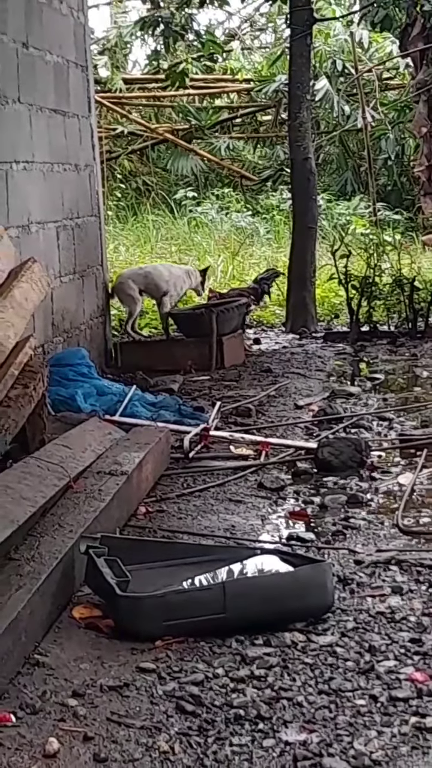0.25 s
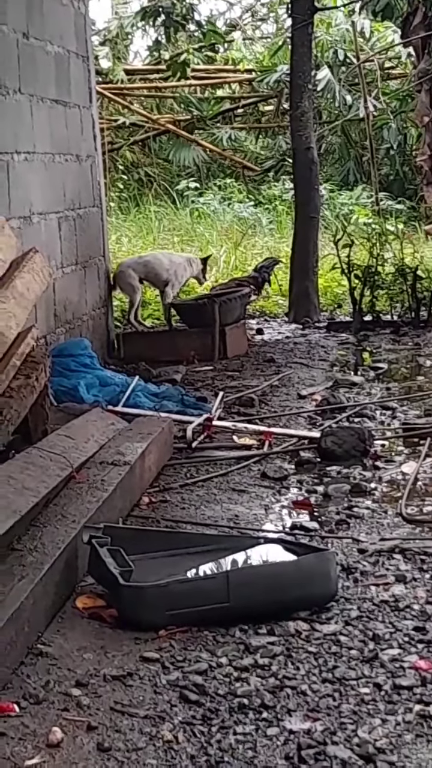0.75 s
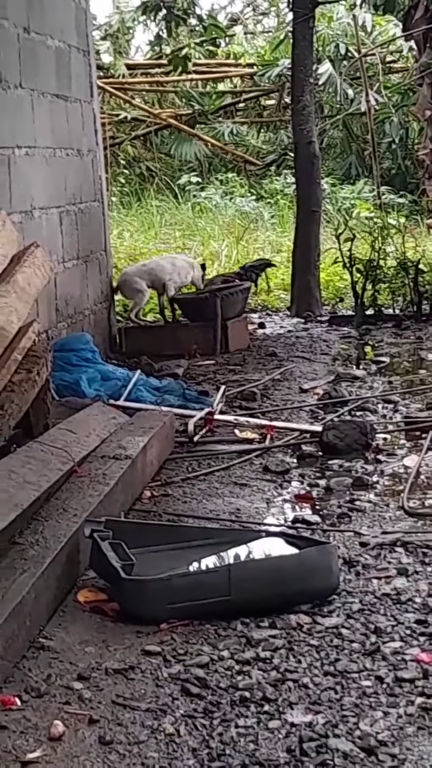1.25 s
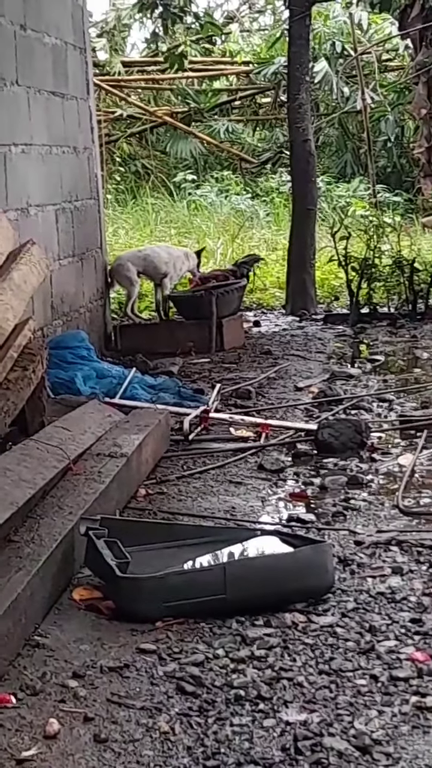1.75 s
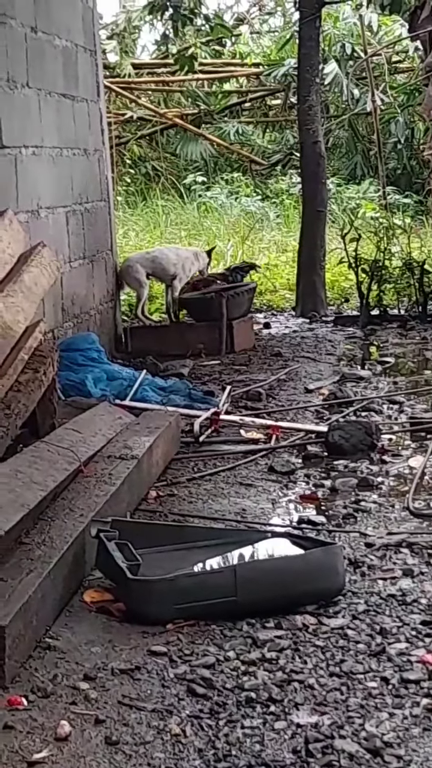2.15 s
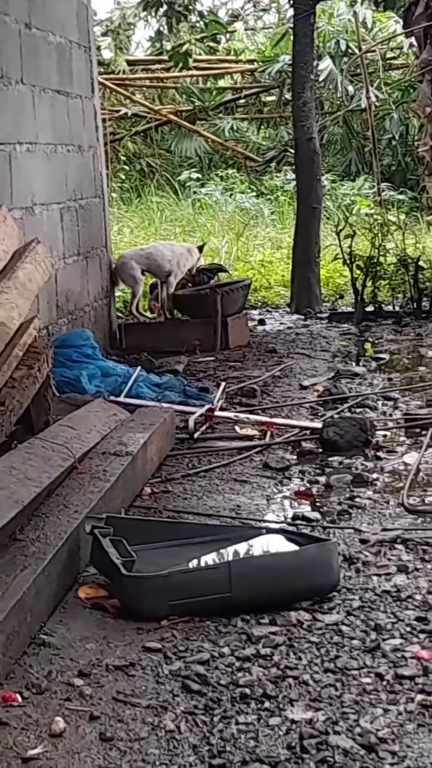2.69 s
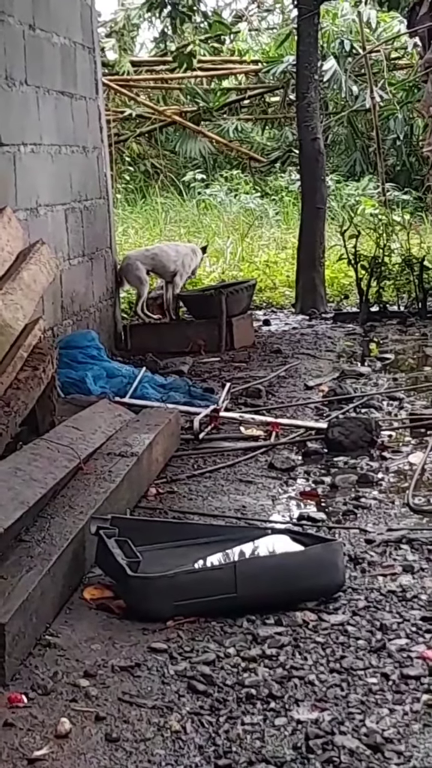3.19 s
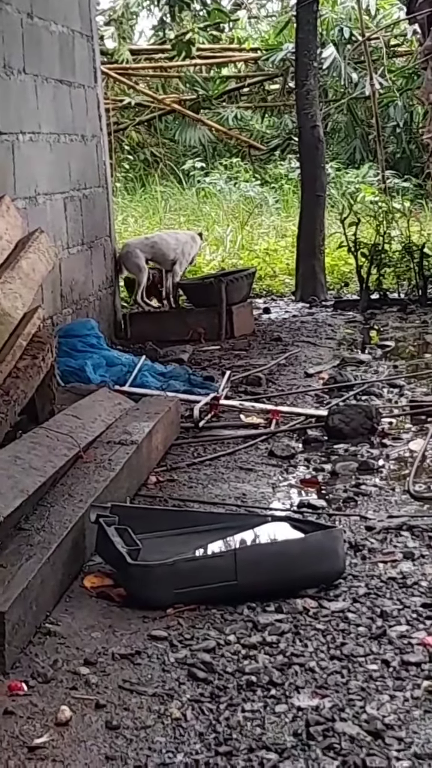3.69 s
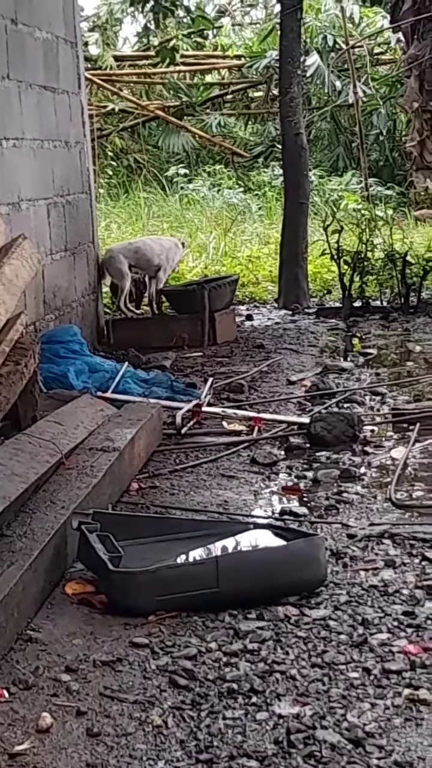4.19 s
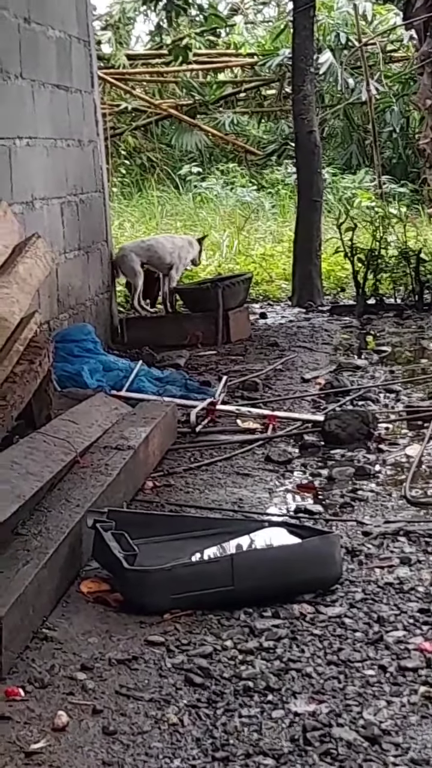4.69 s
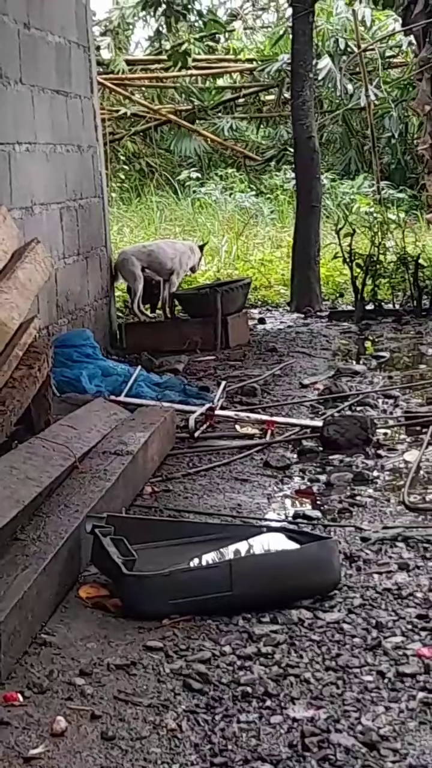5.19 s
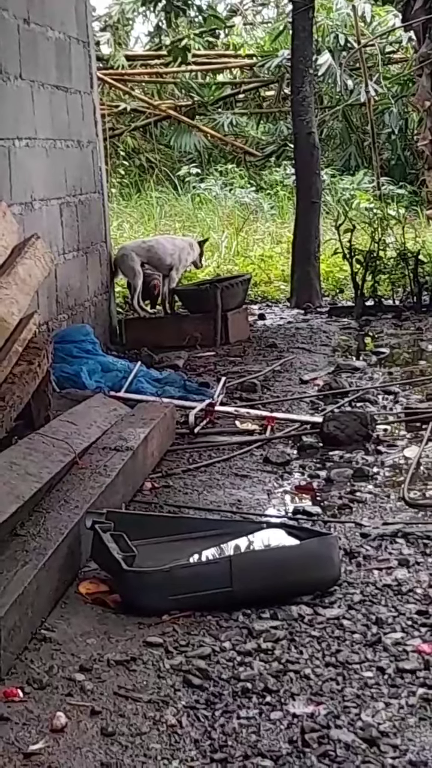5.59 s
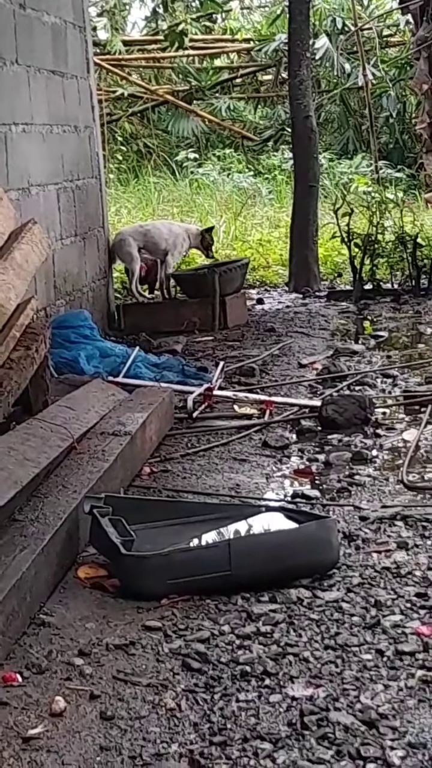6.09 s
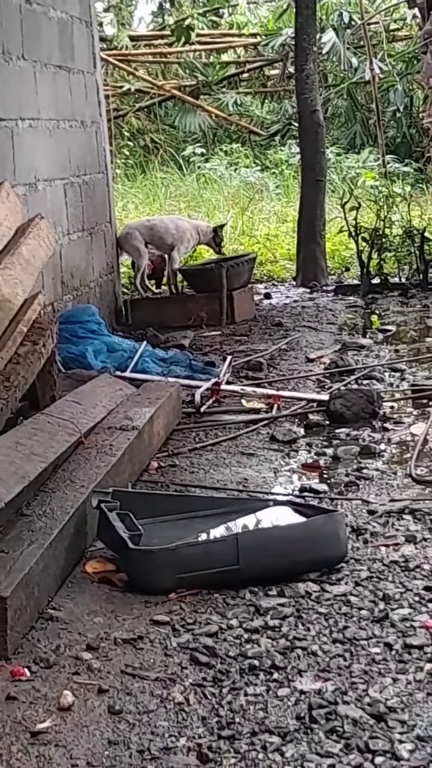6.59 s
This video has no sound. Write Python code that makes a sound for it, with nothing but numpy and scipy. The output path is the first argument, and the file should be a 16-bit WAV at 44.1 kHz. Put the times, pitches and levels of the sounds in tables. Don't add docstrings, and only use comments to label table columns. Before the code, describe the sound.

Two sharp barks, drawn-out throaty growls and a muffled woof ring off a wall while small birds chirp, a dove coos and an engine rumbles far away.

```python
import sys
import numpy as np
from scipy import signal
from scipy.fft import rfft, irfft
from scipy.io import wavfile
from scipy.ndimage import uniform_filter1d

SR = 44100
rng = np.random.default_rng(int(sys.argv[2]) if len(sys.argv) > 2 else 0)


def master_out(mix):
    frames = np.transpose(np.atleast_2d(mix))
    ceiling = np.clip(frames, -1, 1)
    pcm = np.round(ceiling * 32767).astype(np.int16)
    wavfile.write(sys.argv[1], SR, pcm)


def invert_db(x):
    u = np.asarray(x, float) / 20
    return 10 ** u


N = 302073

# centre_hz, width_hz, level_db
BARK_THROAT = [(310, 220, -23), (876, 340, -2.5), (1690, 790, -9.5), (2440, 130, -20.5), (2950, 623, -8.5),
               (4120, 1400, -20), (6000, 2800, -31), (11370, 1700, -28.5), (13800, 3100, -40.5)]


def evened(x):
    return x / np.sqrt(np.mean(x ** 2) + 1e-20)


def read(points, hz):
    f, value = np.transpose(points)
    return np.interp(np.log(hz + 1), np.log(f + 1), value)


def add(mix, s, sound):
    part = mix[..., round(s * SR):][..., :sound.shape[-1]]
    part += sound[..., :part.shape[-1]]


def sides(left_db, right_db):
    return invert_db([[left_db], [right_db]])


def unroll(rows):
    s, *columns = np.transpose(rows)
    t = np.arange(s[0], s[-1], 1 / SR)
    return s[0], [np.interp(t, s, c) for c in columns]


def wander(count, size):
    return evened(uniform_filter1d(uniform_filter1d(rng.standard_normal(count), size), size))


def throat(x, modes):
    out = np.zeros(len(x))
    for k, (hz, width, db) in enumerate(modes):
        b, a = signal.iirpeak(hz, hz / width, SR)
        ringing = signal.lfilter(b, a, signal.lfilter(b, a, x))
        out += (-1) ** k * invert_db(db) * ringing
    return out


def whistle(hz, db, fade):
    turns = np.cumsum(hz * (1 + .006 * wander(len(hz), size=80))) / SR
    return np.sqrt(2) * invert_db(db) * np.sin(2 * np.pi * turns) * signal.windows.tukey(len(hz), fade)


def hiss(points, size, patchy_db):
    # frequency_hz, likeness 0-1
    likeness = [(60, 0.89), (180, 0.92), (550, 0.6), (1650, 0.34), (4970, 0.047), (15000, 0.048)]
    # frequency_hz, left_minus_right_db
    tilt = [(60, 1), (240, -5), (950, -1), (3770, -4), (15000, -0.5)]
    hz = np.fft.rfftfreq(size, 1 / SR)
    a, b, c, d, patches = rng.standard_normal((4 * N // size + 5, len(hz), 5)).T
    patches = uniform_filter1d(patches, size=10, axis=0)
    patches = evened(uniform_filter1d(patches, size=12, axis=1))
    same = np.clip(read(likeness, hz), 0, 1)[:, None]
    left = a + 1j * b
    right = same * left + np.sqrt(1 - same ** 2) * (c + 1j * d)
    z = np.array([left, right])
    inside = (hz >= points[0][0]) & (hz <= points[-1][0])
    lean = invert_db(np.outer([.5, -.5], read(tilt, hz)))[:, :, None]
    z *= lean * invert_db(read(points, hz)[:, None] + patchy_db * patches) * inside[:, None]
    return evened(signal.istft(z, nperseg=size, noverlap=3 * size // 4)[1][:, :N])


def engine():
    # frequency_hz, density_db
    rumble = [(15, -75.5), (32, -32), (52, -9), (76, -4), (113, -6.5), (166, -17), (260, -26.5),
              (400, -66.5)]
    # time_s, level_db
    throb = [
        (0, -56),
        (1.3, -59),
        (2.099, -59),
        (3.301, -59.5),
        (4.3, -62.5),
        (5.698, -55.5),
        (6.85, -65.5),
    ]
    # centre_s, level_db
    boom_swells = [(.03, -52), (.3, -56), (0.548, -61), (.79, -54.5), (1.0, -56), (1.498, -51), (1.68, -54),
                   (1.851, -62), (2.099, -58), (2.51, -52), (2.77, -53.5), (3.08, -55), (3.32, -57.5),
                   (3.9, -58), (4.12, -67.5), (4.6, -70.5), (5.05, -63), (5.45, -59.5), (5.7, -51)]
    boom_hz, boom_s = 92.3, 0.14
    s, db = np.transpose(throb)
    t = np.arange(N) / SR
    swells = sum(invert_db(boom_db) * np.exp(-((t - at) / (.5 * boom_s)) ** 2) for at, boom_db in boom_swells)
    turns = np.cumsum(boom_hz * (1 + 0.02 * wander(N, size=3000))) / SR
    booms = swells * np.sqrt(2) * np.sin(2 * np.pi * turns)
    return invert_db(np.interp(t, s, db)) * hiss(rumble, size=4096, patchy_db=4.5) + booms * sides(-.6, .4)


def air():
    # frequency_hz, density_db
    air_spectrum = [(150, -5.5), (220, -26.5), (300, -6.5), (480, -22.5), (1200, -24), (2000, -23.5),
                    (2900, -16), (4400, -14), (8500, -11.5)]
    return invert_db(-61) * hiss(air_spectrum, size=512, patchy_db=2.5)


def insects():
    # frequency_hz, density_db
    insect_spectrum = [(8500, -13.5), (9550, -11.5), (10500, -2), (11400, -13), (12100, -29.5),
                       (13000, -21.5), (13600, -23.5), (15000, -22)]
    return invert_db(-59) * hiss(insect_spectrum, size=512, patchy_db=1.1)


def bark(rows, modes, second_hz, rough, fade):
    s, (effort_db, hz, second_db, mouth_db) = unroll(rows)
    count, mouth = len(hz), invert_db(mouth_db)
    sag = np.sqrt(np.minimum(hz / hz.mean(), 1))
    other_hz = second_hz * sag * (1 + .03 * wander(count, size=300))
    jitter = 1 + .016 * wander(count, size=50)
    turns = np.cumsum(np.array([hz, other_hz]) * jitter, axis=1) / SR
    voices = []
    for u in turns:
        overtones = sum(np.cos(2 * np.pi * k * u) for k in range(2, 9))
        fundamental = np.sqrt(2) * np.cos(2 * np.pi * u)
        voices.append(fundamental + 0.59 * mouth * throat(overtones, modes))
    first, second = voices
    breath = (0.69 + np.exp(-(turns[0] % 1) / 0.21)) * rng.standard_normal(count)
    breath = rough * mouth * (1 + invert_db(second_db)) * evened(throat(breath, modes))
    voice = first + invert_db(second_db) * second + breath
    return s, invert_db(effort_db) * voice * signal.windows.tukey(count, fade)


def barks():
    # time_s, effort_db, pitch_hz, second_voice_db, mouth_opening_db (on the overtones)
    bark_curves = [
        [(0, -23.5, 777, -4, 13.5), (.022, -26, 750.4, -0.5, 3), (.031, -22, 735, -2.5, 1),
         (.037, -40.5, 700, -11.5, 2), (.06, -34, 600, -7, 0), (.085, -57.5, 480, -16, 3.5)],
        [(1.245, -51.5, 669.5, -14, -11.5), (1.272, -43.5, 860, -9, 10.5), (1.282, -22, 907, -2, -15),
         (1.298, -30, 880.6, 9, 6), (1.318, -23, 884.3, -0.5, 3.5), (1.345, -18.5, 806.3, 0.5, -1),
         (1.368, -19.5, 800, -10, -1.5), (1.39, -28.5, 682, -9, 0.5), (1.435, -52.5, 490, 5.5, 1)],
    ]
    out = np.zeros(N)
    for rows, second_hz, rough in zip(bark_curves, (884, 1075), (.2, .3)):
        add(out, *bark(rows, BARK_THROAT, second_hz, rough, fade=0.014))
    return out


def linger():
    # pitch_hz, level_db, t60_s
    hanging = [(750, -43.5, 0.49), (880, -36, 0.22), (1540, -31, .55), (1850, -42.5, 0.45),
               (2945, -36.5, .5), (3065, -32.5, 0.45)]
    haze_db, haze_t60_s = -35, 0.76
    t = np.arange(SR // 2) / SR
    lines = np.zeros((2, len(t)))
    for ear in lines:
        for hz, db, t60 in hanging:
            decay_db = db - 60 * t / t60 + 5 * wander(len(t), size=500)
            ear += invert_db(decay_db) * whistle(hz + 0 * t, 0, fade=0)
    haze = np.array([evened(throat(rng.standard_normal(len(t)), BARK_THROAT)) for _ in range(2)])
    return lines + invert_db(haze_db - 60 * t / haze_t60_s) * haze


def birds():
    # start_s, start_hz, length_s, level_db
    peeps = [(0.294, 5050, 0.071, -54.5), (0.748, 5010, 0.1, -54), (3.425, 5086, 0.1, -55),
             (3.757, 4930, 0.04, -51.5), (4.155, 4775, 0.057, -54), (4.934, 5120, 0.066, -69),
             (5.206, 5190, .07, -59), (6.302, 5660, 0.055, -63.5), (5.6, 5100, 0.11, -61),
             (5.828, 5010, 0.044, -62), (6.079, 5140, 0.085, -62.5), (6.48, 4670, 0.1, -67)]
    chucks = [(1.903, 3400, .11, -69), (2.497, 3350, .065, -66), (3.131, 3500, .08, -70),
              (2.575, 2350, .06, -71), (4.53, 4500, .1, -66), (3.573, 3610, .04, -67),
              (5.49, 3400, .05, -69), (5.833, 4050, .07, -69), (6.068, 3440, .04, -67),
              (6.329, 3580, .045, -66), (6.535, 3240, .04, -68), (6.73, 3730, .067, -67)]
    swoops = [(3.96, 4950, .14, -65), (4.63, 5350, .2, -62.5), (4.925, 5500, .135, -65),
              (5.08, 4550, .22, -63), (5.335, 5000, .24, -66), (6.6, 5300, .23, -70)]
    lifts = [(1.575, 5010, 0.06, -64.5), (3.691, 5320, 0.062, -61), (4.094, 5860, 0.08, -66.5),
             (4.455, 5460, 0.098, -60), (6.438, 6000, 0.093, -63), (6.791, 5610, .06, -69.5)]
    pips = [(1.692, 2200, .04, -66), (1.64, 6000, .06, -67), (2.915, 5720, .075, -61),
            (5.2, 3950, .08, -66), (2.065, 4800, .15, -62.5), (2.09, 4250, .08, -69),
            (1.83, 4650, .12, -68), (5.44, 2550, .04, -68), (5.04, 3500, .12, -70), (5.27, 2800, .05, -67),
            (5.26, 5700, .05, -68), (5.845, 3620, .07, -64), (2.28, 2450, .05, -68), (2.53, 2550, .06, -67),
            (6.09, 2600, .07, -66), (6.35, 2620, .06, -64), (6.56, 2560, .06, -66), (6.79, 2560, .04, -63),
            (6.55, 4080, .22, -65), (.72, 6250, .08, -64), (.5, 4650, .14, -68), (.96, 4600, .07, -67),
            (1.17, 4600, .08, -67), (1.12, 2750, .12, -69), (4.55, 2700, .08, -68), (5.23, 4450, .12, -64),
            (3.43, 5000, .17, -64), (4.3, 4000, .1, -69)]
    dives = [(2.239, 3770, .067, -68), (4.33, 3700, .04, -66), (4.508, 4000, .04, -57)]
    # end_over_start_pitch, glide_bend, warble 0-1, left_minus_right_db, swell_db
    peep_shape = (.8, .8, .05, -3, 0)
    chuck_shape = (.68, .55, .02, 0, 3)
    swoop_shape = (.5, 2.8, .006, 0, 8)
    lift_shape = (1.16, .67, .025, -6, 0)
    pip_shape = (.99, 1, .025, -3, 0)
    dive_shape = (.58, .5, .003, 0, 4)
    # start_s, length_s, top_hz, bottom_hz, level_db
    trills = [
        (2.429, 0.11, 5650, 4350, -55),
        (2.646, 0.14, 5560, 4250, -54),
        (2.903, 0.153, 5600, 4180, -51.5),
        (3.145, 0.15, 5580, 4370, -54.5),
    ]
    trill_hz = 25.12
    kinds = [(peeps, peep_shape), (chucks, chuck_shape), (swoops, swoop_shape),
             (lifts, lift_shape), (pips, pip_shape), (dives, dive_shape)]
    out = np.zeros((2, N))
    for notes, (end, bend, warble, pan_db, swell_db) in kinds:
        for s, start_hz, length, db in notes:
            u = np.linspace(0, 1, round(length * SR))
            hz = start_hz * (1 + (end - 1) * u ** bend) * (1 + warble * wander(len(u), size=110))
            note = whistle(hz, db + swell_db * (u - .7), fade=.5)
            add(out, s, sides(.5 * pan_db, -.5 * pan_db) * note)
    for s, length, top_hz, bottom_hz, db in trills:
        u = np.arange(round(length * SR)) * trill_hz / SR % 1
        hz = (top_hz + (bottom_hz - top_hz) * u) * (1 + 0.032 * wander(len(u), size=100))
        add(out, s, whistle(hz, db, fade=0.56) * np.sin(np.pi * u) * sides(-1.5, 1.5))
    return out


def flock():
    count, busy_from_s, quietest_db = 40, 4.6, -81
    low_hz, high_hz = 3600, 5800
    out = np.zeros((2, N))
    for k, (when, pitch, fall, span, size, side) in enumerate(rng.random((count, 6))):
        first = busy_from_s if k % 3 else 0
        u = np.linspace(0, 1, round((.04 + .12 * span) * SR))
        glide = 1 - (.1 + .35 * fall) * u ** (.6 + 2.5 * span)
        hz = (low_hz + (high_hz - low_hz) * pitch) * glide
        pan_db = 4 * (side - .5)
        chirp = whistle(hz, quietest_db + 7 * size, fade=.6)
        add(out, first + when * (N / SR - first), sides(pan_db, -pan_db) * chirp)
    return out


def growl(rows):
    # frequency_hz, level_db
    muzzle = [(170, 2.5), (220, -3.5), (340, -0.5), (400, -0.5), (530, 2.5), (640, -12), (780, -35),
              (1050, -39.5)]
    # centre_hz, width_hz, level_db
    rasp = [(300, 160, -4.5), (550, 550, -10.5), (786, 420, -13.5)]
    # centre_hz, width_hz, level_db
    gape = [(860, 170, 2), (1282, 90.2, -12.5)]
    flutter_hz, flutter_depth, flutter_pitch, breath_share = 28, .42, .045, .5
    s, (hz, effort_db) = unroll(rows)
    count = len(hz)
    flap = np.sin(2 * np.pi * np.cumsum(flutter_hz * (1 + 0.15 * wander(count, size=2500))) / SR)
    turns = np.cumsum(hz * (1 + flutter_pitch * flap + .013 * wander(count, size=90))) / SR
    tone = np.zeros(count)
    for k in range(1, 6):
        partial = np.cos(2 * np.pi * k * turns + 1.72 * k)
        tone += np.sqrt(2) * invert_db(read(muzzle, k * hz) + 1.1 * wander(count, size=250)) * partial
    pulses = np.exp(-(turns % 1) / 1.6)
    breath = evened(throat(pulses * rng.standard_normal(count), rasp))
    closing = np.exp(-np.arange(count) / (.3 * SR))
    breath += 1.44 * closing * evened(throat(rng.standard_normal(count), gape))
    flap_amount = np.clip(0.57 + .25 * wander(count, size=2500), 0, 2)
    voice = invert_db(effort_db) * (tone + breath_share * breath) * (1 + flutter_depth * flap * flap_amount)
    return s, voice * signal.windows.tukey(count, 3000 / count)


def growls():
    # time_s, pitch_hz, effort_db
    growl_curves = [
        [(.37, 195, -45), (.41, 199.7, -54.5), (.6, 203.2, -54.5), (.85, 203.9, -52.5), (1.05, 202.2, -54.5),
         (1.19, 200.8, -54), (1.24, 264.4, -55.5), (1.3, 300, -41)],
        [(1.76, 196.7, -52.5), (1.96, 230, -50.5), (2.08, 202.1, -53), (2.25, 189.1, -60), (2.5, 174.4, -61.5),
         (2.7, 183.9, -59.5), (2.98, 212.7, -52), (3.54, 207.8, -53.5), (3.66, 161.2, -78)],
        [(4.58, 219.8, -46.5), (4.68, 174.4, -63), (4.85, 165.8, -63), (5.25, 187, -55), (5.5, 179.5, -59),
         (5.7, 189.2, -55), (5.98, 156.2, -63.5), (6.08, 162.5, -67), (6.16, 173.5, -81.5)],
    ]
    out = np.zeros(N)
    for rows in growl_curves:
        add(out, *growl(rows))
    return out


def dove():
    # offset_s, length_s, top_hz, level_db
    coo_notes = [
        (0, 0.044, 961, -53.5),
        (0.022, .152, 1149, -44.5),
        (0.177, 0.042, 1056, -52.5),
        (0.237, 0.0293, 1064, -47),
        (0.296, 0.034, 960, -52.5),
        (.392, 0.0395, 1005, -50),
        (0.493, 0.12, 1075, -51),
    ]
    # start_s, level_db, time_stretch, tiredness
    phrases = [
        (1.32, -5, 1.0, 1),
        (3.27, 0, 1.0, 1),
        (5.54, .5, 1.02, 2.6),
    ]
    scoop_depth, scoop_s, drop_depth, drop_s = 0.18, .012, 0.11, 0.018
    sag_hz_per_s, edge_db = 405, 6.5
    tire_db_per_s = 37.5
    out = np.zeros(N)
    for start, phrase_db, stretch, tired in phrases:
        for s, length, top_hz, db in coo_notes:
            t = np.arange(0, length, 1 / SR)
            scoop = np.clip(1 - t / scoop_s, 0, 1) ** .5
            drop = np.clip(1 - (length - t) / drop_s, 0, 1)
            hz = top_hz * (1 - scoop_depth * scoop - drop_depth * drop) - sag_hz_per_s * t
            tiring_db = tired * tire_db_per_s * t * s / coo_notes[-1][0]
            note_db = db + phrase_db - edge_db * (scoop + drop) - tiring_db
            add(out, start + stretch * s, whistle(hz, note_db, fade=min(300 / len(hz), 1)))
    return out


def ticks():
    # start_s, level_db, low_knock_db, bright_edge_db
    knocks = [
        (2.419, -47, -2, -25),
        (3.416, -36, -22, 1),
        (3.767, -42, -12, 2),
        (4.011, -51, 14, -12),
    ]
    out, t = np.zeros(N), np.arange(900) / SR
    for s, db, low_db, edge_db in knocks:
        snap = rng.standard_normal(len(t)) * np.exp(-t / 0.0032)
        ring = throat(snap, [(1160, 640, low_db + 21.5), (3520, 5000, 0), (10080, 5500, edge_db - 0.5)])
        add(out, s, invert_db(db) * ring / abs(ring).max())
    return out


def hums():
    # start_s, length_s, pitch_hz, level_db, pitch_scatter 0-1
    far_notes = [(3.056, 0.47, 1589, -73, 0.02), (3.819, 0.16, 298.4, -66.5, 0),
                 (4.179, 0.2, 298.7, -77.5, 0), (6.3, 0.092, 1100, -64, 0.11),
                 (6.129, 0.062, 990, -68, 0.26), (6.5, 0.14, 900, -70.5, .16),
                 (6.475, 0.087, 1300, -75.5, .02), (6.5, .07, 260, -80, 0), (3.85, 0.234, 800, -73, 0.2),
                 (6.479, 0.06, 635, -66.5, 0.04), (6.115, 0.11, 2400, -70, .06),
                 (6.364, 0.186, 2150, -68, 0.06), (6.583, 0.142, 2200, -69, 0.05)]
    out = np.zeros(N)
    for s, length, hz, db, scatter in far_notes:
        pitch = hz * (1 + scatter * wander(round(length * SR), size=90))
        add(out, s, whistle(pitch, db, fade=0.28))
    return out


def woof():
    # time_s, effort_db, pitch_hz, second_voice_db, mouth_opening_db (on the overtones)
    woof_curve = [
        (4.462, -69, 242.8, -23, 5.5),
        (4.49, -57, 270, -16, 3.3),
        (4.51, -46, 278.4, -3.5, 4.3),
        (4.53, -64, 261.6, 22.5, 5.1),
        (4.56, -57, 256.3, 7, 8.6),
        (4.62, -69, 202, -17, 5.5),
    ]
    # centre_hz, width_hz, level_db
    woof_throat = [(270, 320, -1.5), (542, 140, 6.5), (767, 235, 4), (1130, 260, -7.5), (1340, 200, -9)]
    out = np.zeros(N)
    add(out, *bark(woof_curve, woof_throat, second_hz=660, rough=.55, fade=0.22))
    return out


def wall(thrown):
    # delay_s, level_db, left_lag_s
    bounces = [
        (.004, -12, .0003),
        (.011, -29, -0.0056),
        (.019, -9, -0.0067),
        (0.032, -12, 0.0045),
    ]
    out = np.zeros((2, N))
    for s, db, lag in bounces:
        add(out[0], s + lag, invert_db(db) * thrown)
        add(out[1], s, invert_db(db) * thrown)
    return out


def yard(x, wet_db, delay, stretch):
    # frequency_hz, t60_s
    decay = [(300, 1), (800, 0.38), (1600, 0.99), (3200, 0.79), (7000, 0.6), (12000, 0.44)]
    # frequency_hz, likeness 0-1
    echo_likeness = [(200, 0.91), (700, 0.15), (1500, 0.07), (4000, 0.059)]
    taps = np.zeros((2, SR))
    at = np.arange(int(delay * SR), SR - 20, 20)
    at = at + rng.integers(0, 20, (2, len(at)))
    np.put_along_axis(taps, at, rng.choice([-1., 1.], at.shape), 1)
    hz, t, z = signal.stft(taps, SR, nperseg=256)
    same = np.clip(read(echo_likeness, hz), 0, 1)[:, None]
    z[1] = same * z[0] + np.sqrt(1 - same ** 2) * z[1]
    dying = invert_db(-60 * t / (stretch * read(decay, hz)[:, None]))
    tail = signal.istft(z * dying, SR, nperseg=256)[1]
    tail *= invert_db(wet_db) / np.linalg.norm(tail[0])
    return signal.fftconvolve(x * np.ones((2, 1)), tail, axes=1)[:, :N]


def scene():
    dog = barks() + growls() + woof()
    thrown = signal.lfilter(*signal.butter(1, 560, "high", fs=SR), dog)
    echoes = wall(thrown) + yard(thrown, wet_db=-5.0, delay=.02, stretch=0.78)
    direct = np.array([dog, np.roll(dog, 1)])
    near = direct * sides(-2.1, .6) + echoes * sides(-1.5, 1.2)
    add(near, 0, linger())
    knocks = ticks()
    near += knocks + yard(knocks, wet_db=-9, delay=.006, stretch=.4)
    coos = dove() + hums()
    coos = coos * sides(-.6, -1.1) + yard(coos, wet_db=-5, delay=.012, stretch=0.69)
    song = birds() + flock()
    song = invert_db(.5) * song + yard(song, wet_db=3, delay=.008, stretch=1.0)
    return near + coos + song + engine() + air() + insects()


def top_cut(x):
    return signal.sosfilt(signal.butter(12, 15480, fs=SR, output="sos"), x)


def record(dry):
    # frequency_hz, level_db
    microphone = [(30, 3), (7600, -2), (8500, -20), (9300, -4), (10000, -0.5), (20000, -1.5)]
    response = invert_db(read(microphone, np.fft.rfftfreq(N, 1 / SR)))
    coloured = irfft(rfft(dry) * response, N)
    return top_cut(coloured)


dry = scene()
out = record(dry)
master_out(out)
```